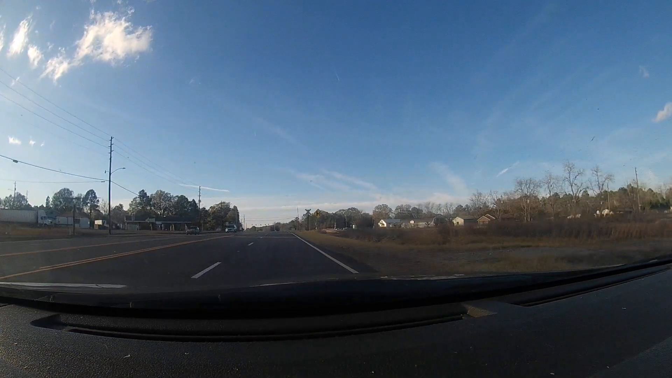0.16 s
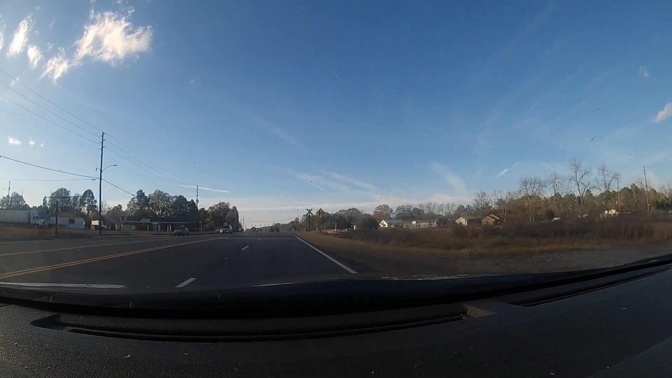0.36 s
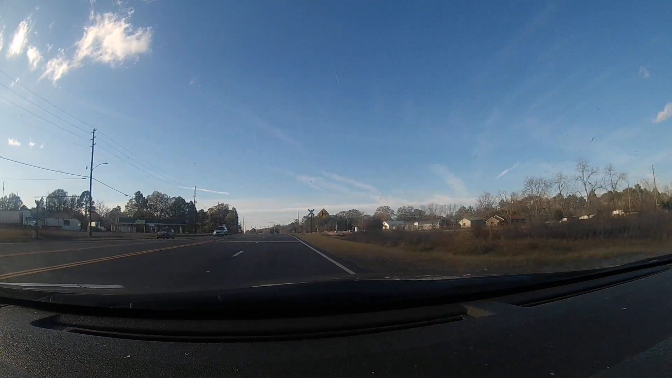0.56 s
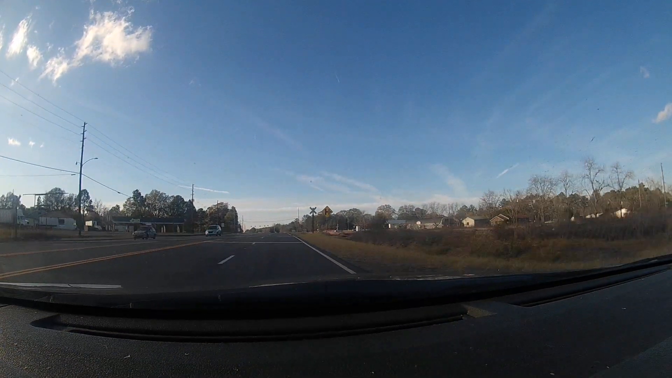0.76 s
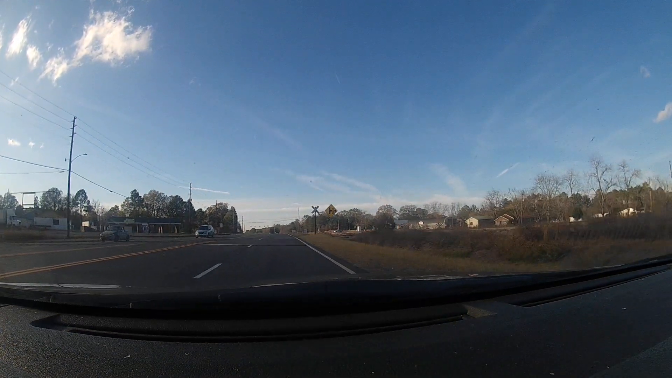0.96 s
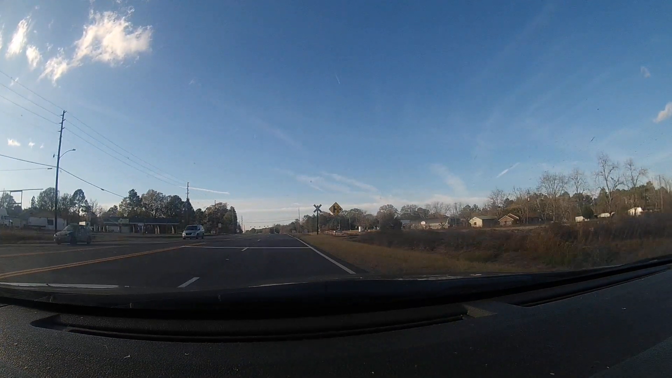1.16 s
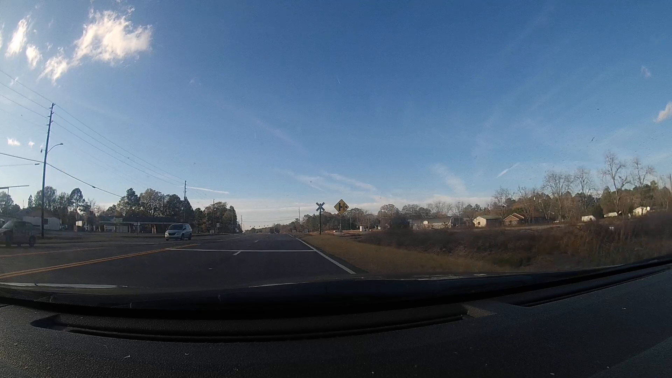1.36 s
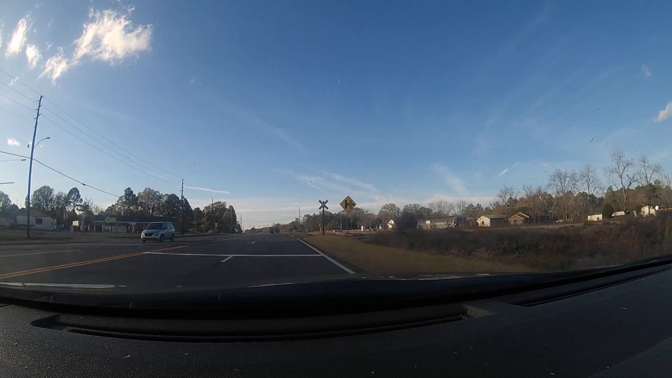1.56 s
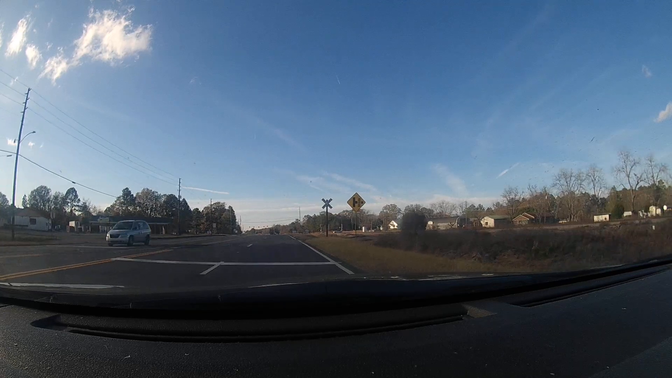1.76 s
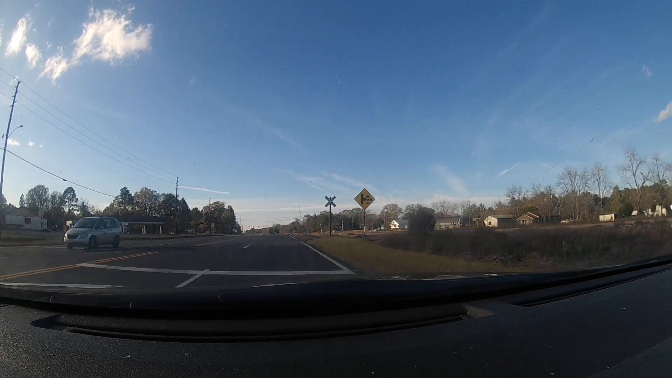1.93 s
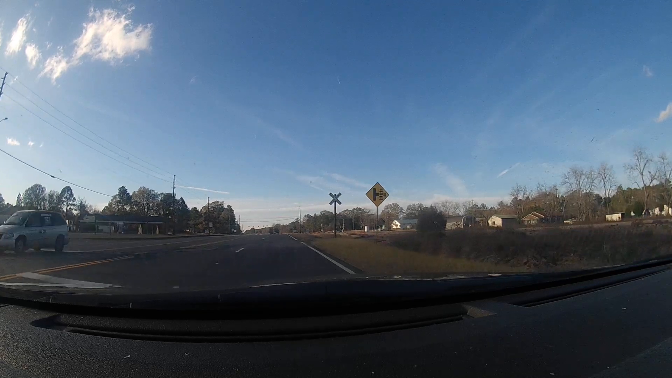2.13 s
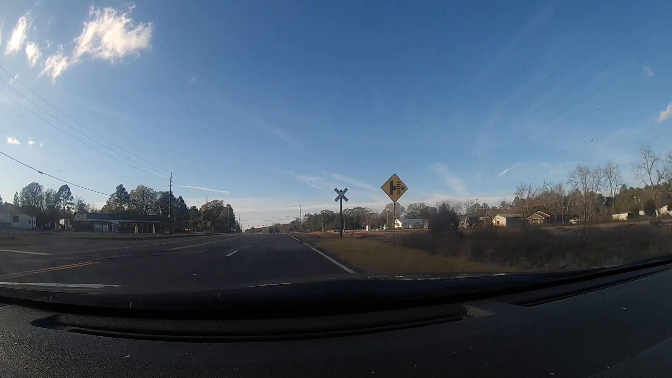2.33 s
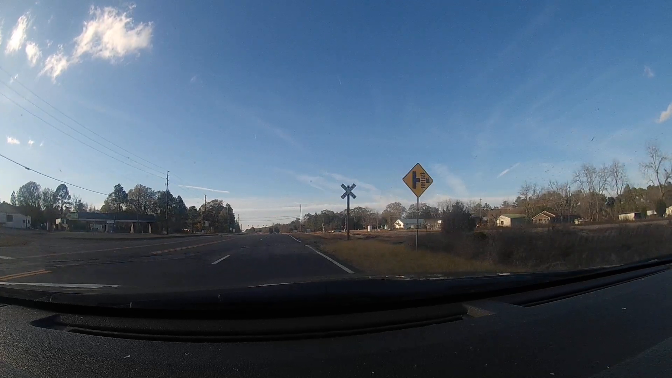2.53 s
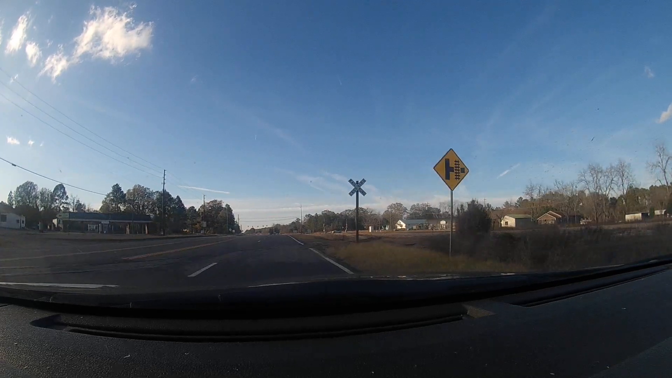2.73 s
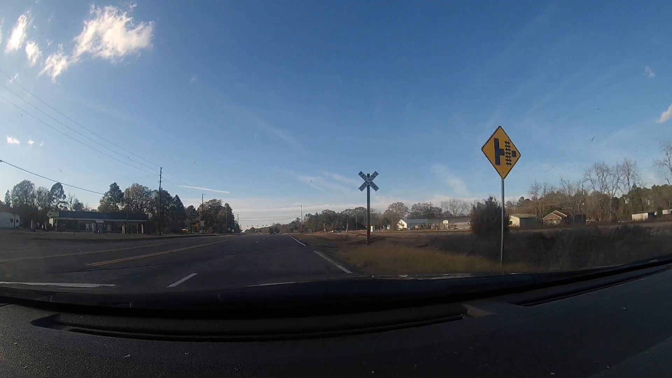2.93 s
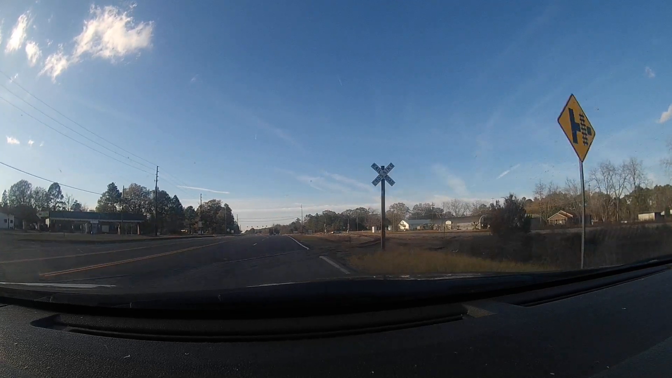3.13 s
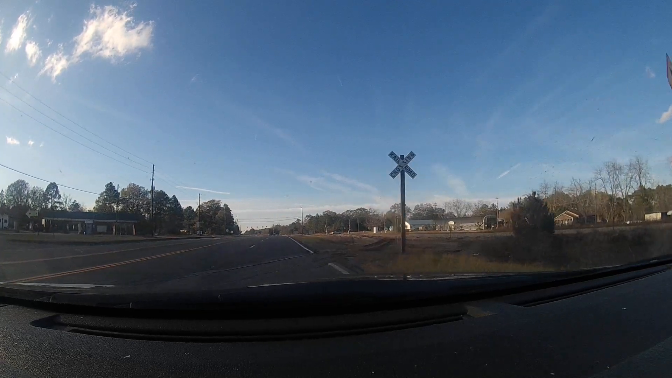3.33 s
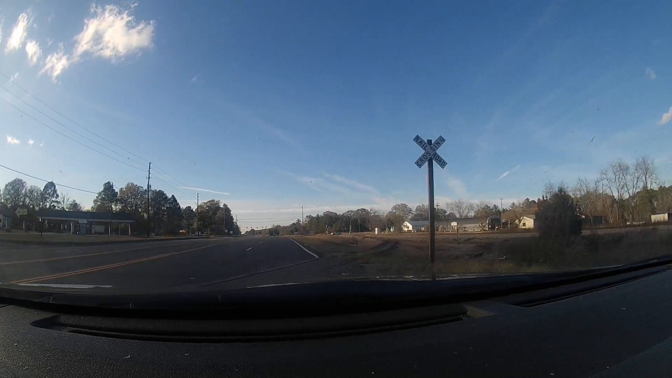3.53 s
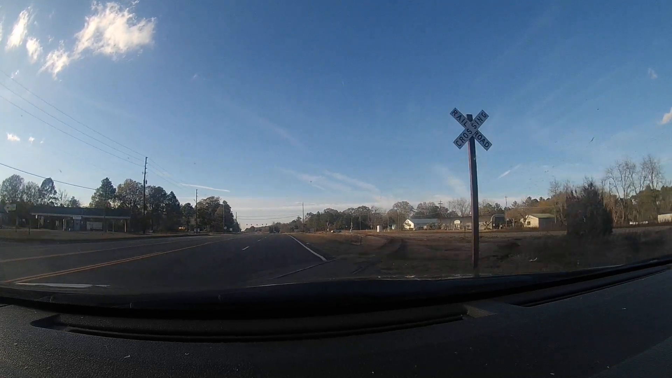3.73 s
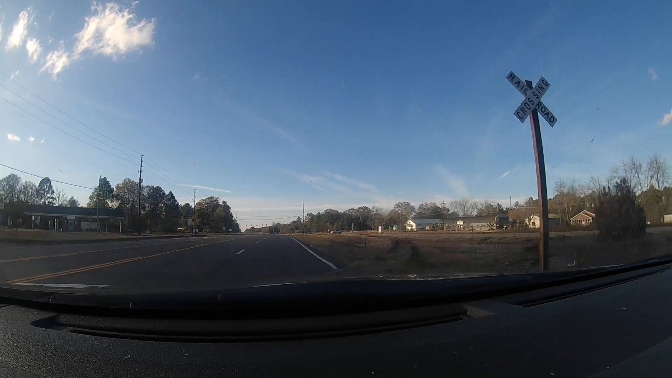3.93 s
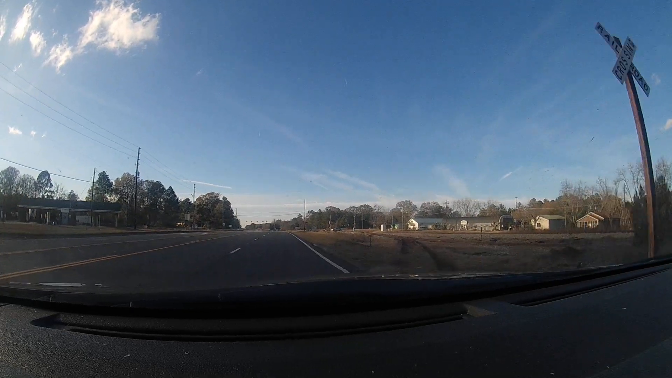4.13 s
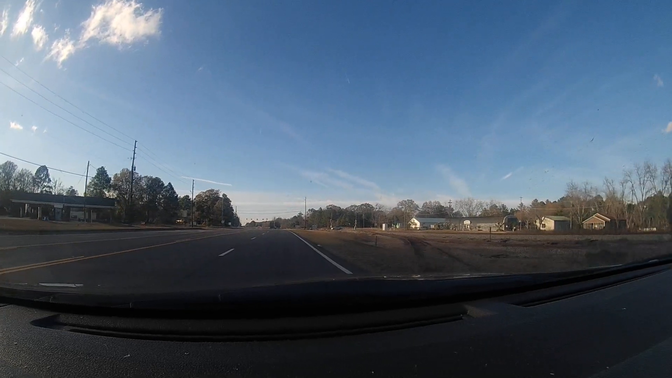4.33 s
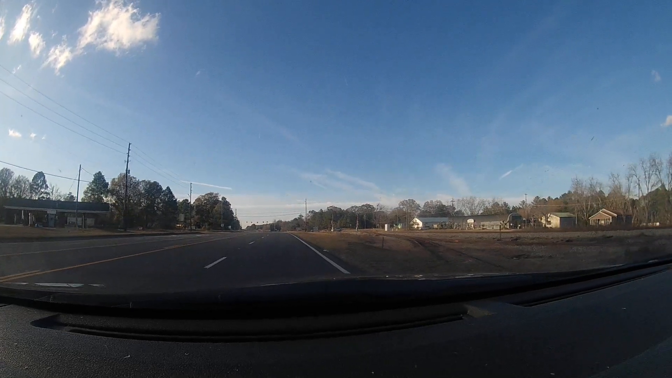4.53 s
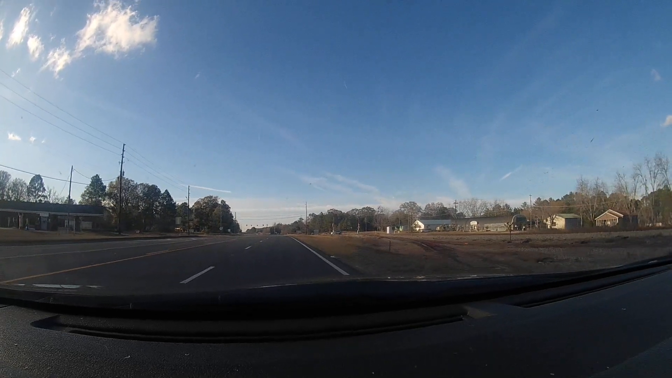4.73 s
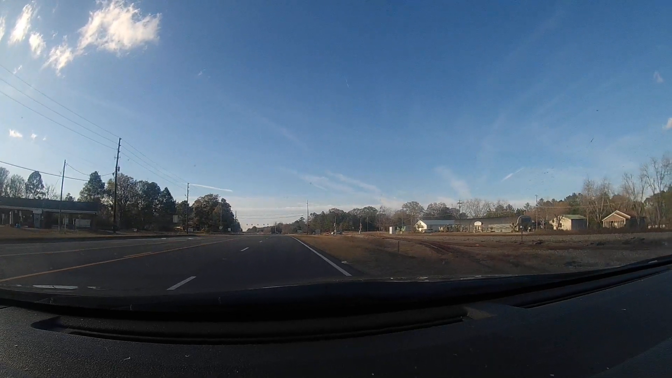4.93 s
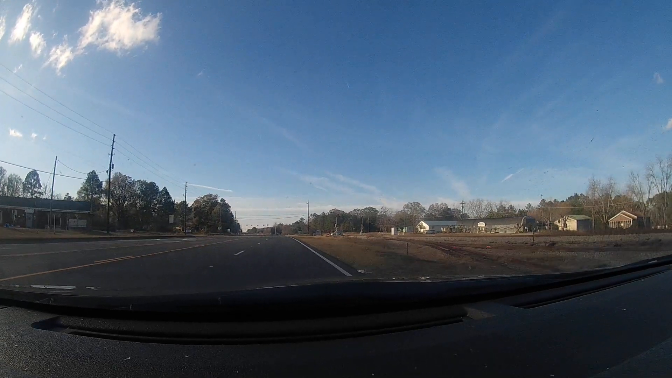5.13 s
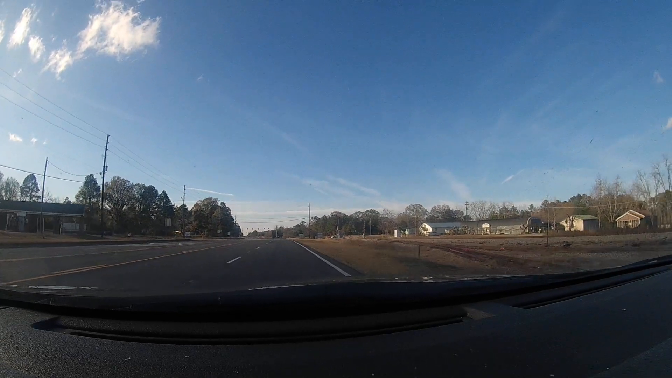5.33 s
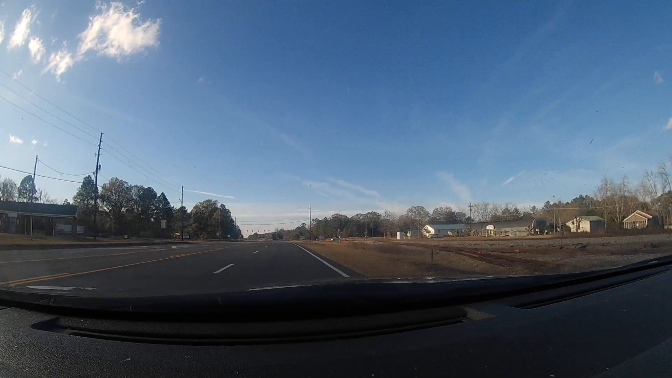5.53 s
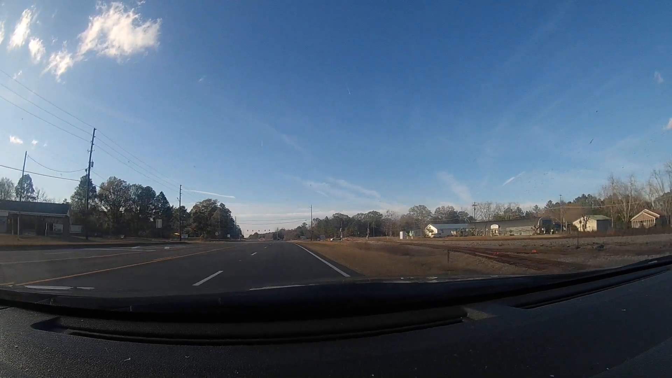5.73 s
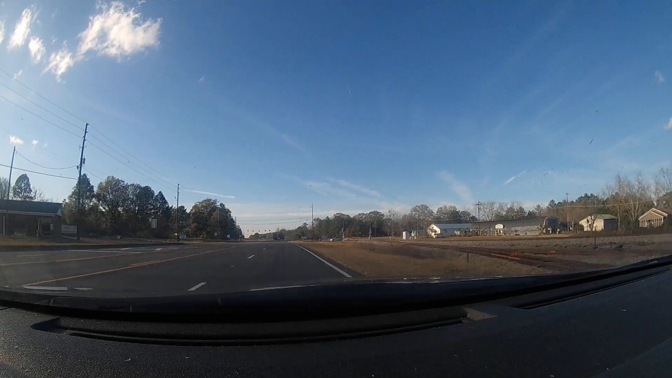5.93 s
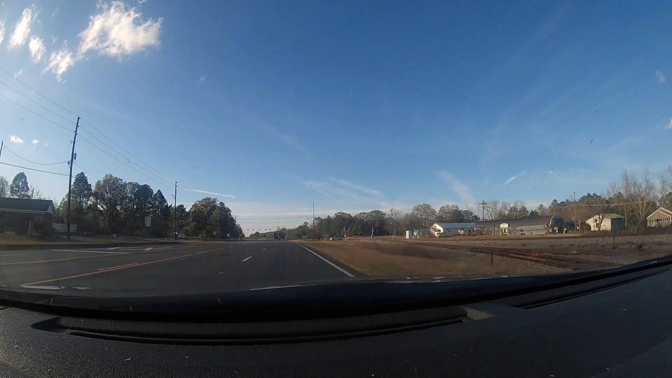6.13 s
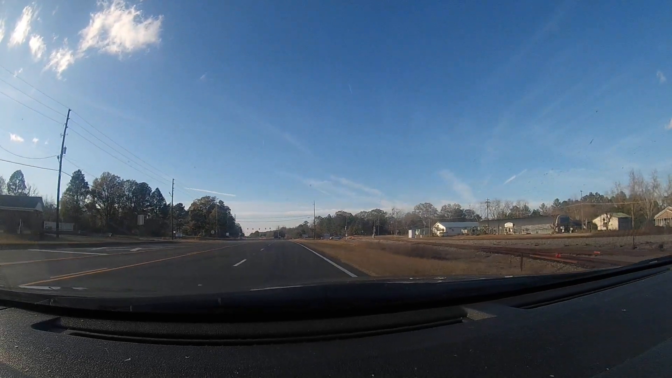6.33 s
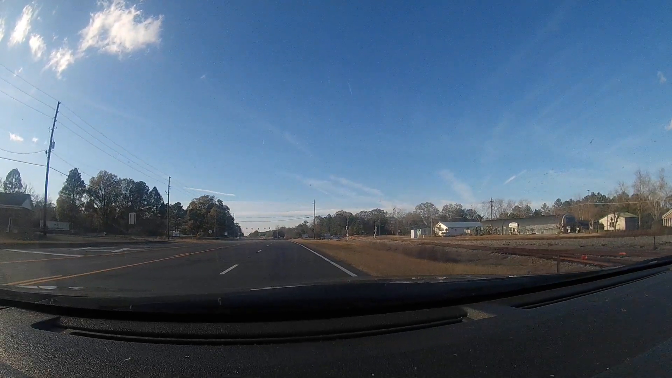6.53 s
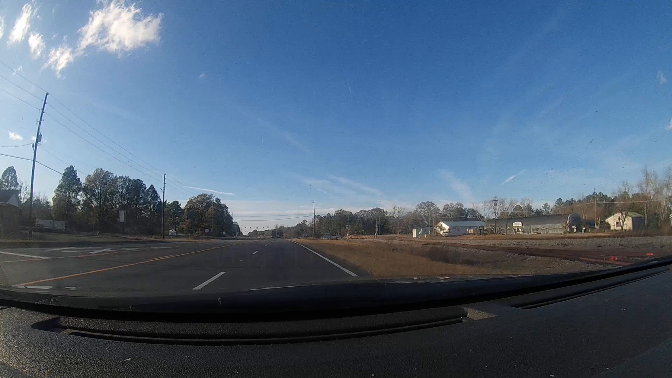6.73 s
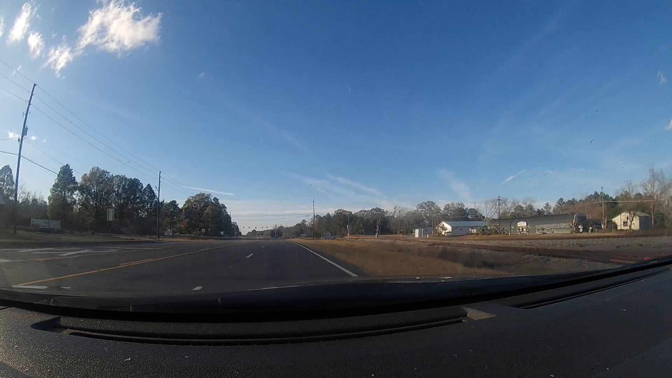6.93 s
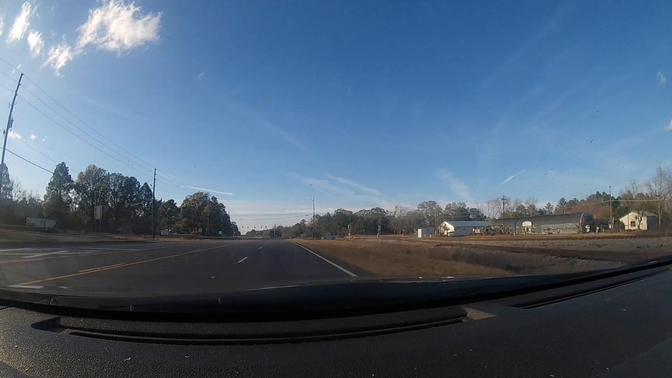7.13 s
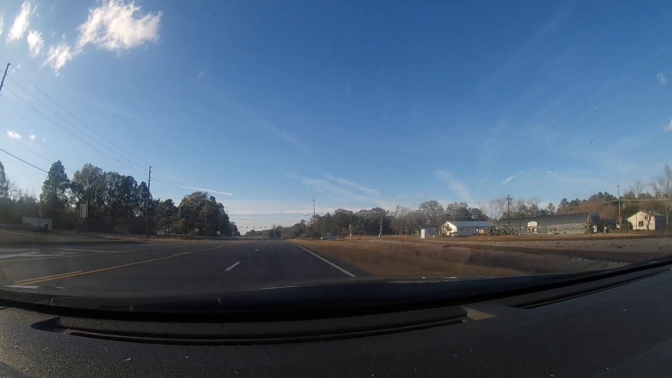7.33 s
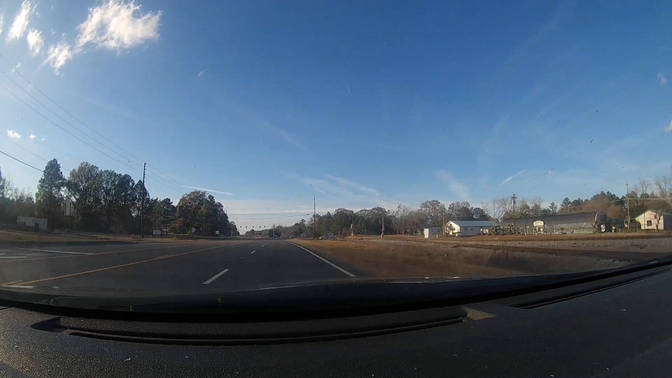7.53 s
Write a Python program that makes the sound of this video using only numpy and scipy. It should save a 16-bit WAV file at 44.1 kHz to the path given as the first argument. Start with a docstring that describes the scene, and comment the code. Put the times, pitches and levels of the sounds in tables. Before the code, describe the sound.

A camera at the windscreen hears the cabin of a car on a highway: heavy, wavering low boom, body rumble, muffled tyre roar and drone, thin air hiss and a low engine hum. Light plastic ticks scatter over the first 1.5 s. Around 2 s an oncoming car gives a soft swell of tyre noise and fades as this car slows. A bump thumps at 2.7 s with more ticks; from about 3 s the road is smoother and slightly quieter. At 3.5-3.9 s tyres growl and quick clicks cluster. From 4 to 4.8 s the rails bring deep, overloaded booms, thumps near 4.3 and 4.55 s, creaking, sizzling trim and hard chattering plastic knocks from 4.5 s. After 5 s the knocks stop; engine hum rises, strongest near 6.3 s, and fuller tyre roar returns until 7.6 s. Very faint electronic hiss, high whine and chirps lie underneath.

```python
"""A deep boom, a tyre roar and an engine hum fill a car on a highway, heard from a camera at the windscreen.
The car slows, rolls over a level crossing and picks up speed. Shaped noise makes the boom, roar and air hiss;
sine waves on multiples of the wheel and firing rates make the tyre drone and the engine.
Loose plastic rings in light ticks and, on the rails, in hard knocks; an oncoming car swells and fades.
The camera adds hiss, whine and chirps, overloads on the deepest booms and limits the peaks."""
import sys
import numpy as np
from scipy import signal
from scipy.fft import rfft, irfft
from scipy.io import wavfile
from scipy.ndimage import uniform_filter1d, minimum_filter1d

SR = 44100
rng = np.random.default_rng(int(sys.argv[2]) if len(sys.argv) > 2 else 0)


def to_wav(s):
    """Save 16-bit WAV."""
    ch = np.atleast_2d(s).T  # columns
    pcm = np.round(np.clip(ch, -1, 1) * 32767)  # PCM
    wavfile.write(sys.argv[1], SR, pcm.astype(np.int16))


N = 334719
T = np.arange(N) / SR
HIT_T = T[:3000]  # the time within one short contact


def undb(db):
    """Turn decibels into a gain."""
    return 10 ** (np.asarray(db) / 20)


def unit(x):
    """Scale a sound to an average (rms) level of 1."""
    return x / np.sqrt(np.mean(x ** 2))


def curves(table):
    """Draw each column of a time table as a smooth run of samples."""
    s, *columns = np.transpose(table)
    return [np.interp(T, s, column) for column in columns]


def walk(rate_hz):
    """Wander at random: levels held for 1 / rate seconds, smoothed twice, rms 1."""
    hold = int(SR / rate_hz)
    held = rng.standard_normal(1024)[np.arange(N) // hold]
    return unit(uniform_filter1d(uniform_filter1d(held, hold), hold))


def noise(colour, resonances=()):
    """Make noise of rms 1 with a broad colour, lifted around each resonance."""
    f = np.arange(N // 2 + 1) * SR / N
    hz, db = np.transpose(colour)
    gain = undb(np.interp(np.log(f + 1), np.log(hz), db))
    # beyond its ends the colour falls away steeply
    gain = gain * np.minimum(f / hz[0], 1) ** 2 * np.minimum(hz[-1] / (f + 1), 1) ** 2
    for centre, width, lift_db in resonances:
        gain = gain * undb(lift_db / (1 + (2 * (f - centre) / width) ** 2))
    return unit(irfft(rfft(rng.standard_normal(N)) * gain, N))


def even(x, span_s):
    """Hold a noise's slow level steady, keeping its quick beating."""
    span = int(span_s * SR)
    power = uniform_filter1d(uniform_filter1d(x ** 2, span), span)
    return x / np.sqrt(power)


def stretch(start_s, end_s, edge_s):
    """Give 1 while the car is on a stretch of road and 0 elsewhere, with soft edges."""
    return (np.tanh((T - start_s) / edge_s) - np.tanh((T - end_s) / edge_s)) / 2


def rotor(turn_hz, orders, waver_db, slip_rad):
    """Add up sines at multiples of a turning rate, each wavering in level and phase."""
    turn = 2 * np.pi * np.cumsum(turn_hz) / SR
    total = np.zeros(N)
    for multiple, db in orders:
        level = undb(db + waver_db * walk(5.5))
        start = 2 * np.pi * rng.random()
        total += level * np.sin(multiple * turn + slip_rad * walk(4) + start)
    return unit(total)


def ring(modes, scatter_db, detune, contact_hz):
    """Strike a set of fading tones, peak 1; neighbouring tones swing in opposite directions."""
    hz, db, t60 = np.transpose(modes)[:, :, None]
    weight, shift = rng.standard_normal((2, len(modes), 1))
    direction = (-1) ** np.arange(len(modes))[:, None]
    swing = direction * np.sin(2 * np.pi * hz * (1 + detune * shift) * HIT_T)
    fade = np.exp(-np.log(1000) * HIT_T / t60)
    y = np.sum(undb(db + scatter_db * weight) * fade * swing, axis=0)
    # a softer contact pushes for longer and wakes less treble
    softness = signal.butter(2, min(contact_hz, SR / 3), fs=SR, output="sos")
    y = signal.sosfilt(softness, y)
    return y / np.abs(y).max()


def add(out, s, sound):
    """Mix a short sound in at time s."""
    i = int(s * SR)
    out[i:i + len(sound)] += sound[:N - i]


# bumps in the road, the biggest at the rails: (time [s], cabin boom level [dB])
BUMPS = [(0.2, -17), (0.45, -17), (0.94, -16.5), (1.22, -15.5), (2.32, -14), (2.711, -11.5), (3.08, -14),
         (3.45, -18.5), (3.8, -13), (4.07, -8.5), (4.3, -5.5), (4.441, -8), (4.74, -9.5), (5.47, -16.5),
         (5.93, -23), (6.35, -13.5), (6.78, -14.5), (7.07, -13), (7.4, -14.5)]
BUMP_RISE_S, BUMP_DECAY_S, STEADY_BOOM_DB = 0.083, 0.33, -19.5


def heave():
    """Find the cabin boom's level in dB: each bump's energy adds to that of the steady road."""
    power = undb(STEADY_BOOM_DB) ** 2
    for s, db in BUMPS:
        before, after = np.minimum(T - s, 0), np.maximum(T - s, 0)
        swell = np.exp(-(before / BUMP_RISE_S) ** 2 - after / BUMP_DECAY_S)
        power = power + (undb(db) * swell) ** 2
    return 10 * np.log10(power)


# colour of the cabin's boom: (frequency [Hz], relative level [dB per Hz])
BOOM_COLOUR = [(8, -22), (17, 8), (31, 2), (45, 3), (56, -13.5), (80, -7.5), (100, -10), (150, -32.5)]
# the cabin's lowest air resonance: (frequency [Hz], width [Hz], lift [dB])
BOOM_RESONANCE = [(42.1, 31, 5.5)]
# colour of the axles' thump: (frequency [Hz], relative level [dB per Hz])
AXLE_COLOUR = [(52, -5), (66, 0), (74, -3.5), (82, -2.5), (95, -8), (130, -11), (155, -13.5), (190, -17.5)]
# colour of the body's rumble: (frequency [Hz], relative level [dB per Hz])
BODY_COLOUR = [(70, -24.5), (105, 3), (130, 3), (160, -0.5), (210, -7), (243, 1), (280, -4.5), (325, -4.5),
               (370, -10.5), (430, -11.5), (490, -22), (700, -32), (1500, -54)]
# course of the body's rumble, before its gain: (time [s], level [dB])
RUMBLE_LEVEL = [(0.15, -24.5), (0.21, -24), (1.55, -24), (1.59, -26), (2.35, -23), (3.28, -27),
                (3.6, -24.5), (4.66, -23.5), (5.01, -25), (7.41, -23.5), (7.45, -25)]
RUMBLE_GAIN_DB = 3
# the axles swell more steeply than the cabin: level at a 0 dB boom [dB], slope [dB per dB]
AXLE_DB, AXLE_SLOPE = 0, 1.77


def shaking(boom_db):
    """Road texture shakes the cabin air, the axles and the body: three bands of low noise."""
    rumble_db, = curves(RUMBLE_LEVEL)
    boom = even(noise(BOOM_COLOUR, BOOM_RESONANCE), span_s=0.096) * undb(boom_db)
    axle = even(noise(AXLE_COLOUR), span_s=0.14) * undb(AXLE_DB + AXLE_SLOPE * boom_db)
    body = even(noise(BODY_COLOUR), span_s=0.16) * undb(rumble_db + RUMBLE_GAIN_DB)
    return boom + axle + body


# road speed, also played by tyres(): (time [s], wheel turns [Hz], tyre drone level [dB])
WHEEL_SPEED = [(0, 7.12, -16), (1, 7.08, -20.5), (1.8, 6.03, -28.5), (2.6, 7.36, -23.5), (3.3, 5.82, -23),
               (4.3, 5.5, -17), (5.5, 5.83, -27), (7.59, 7.14, -21)]
# colour of the tread's roar: (frequency [Hz], relative level [dB per Hz])
ROAR_COLOUR = [(300, -4), (550, 1), (800, -3), (1000, 0.5), (1130, -3.5), (1300, -3.5), (1600, -6.5),
               (1760, -17), (2200, -33), (4000, -41.5)]
# air resonances of the cabin that colour the roar: (frequency [Hz], width [Hz], lift [dB])
CABIN_RESONANCES = [(559.5, 28, 5), (742.4, 79, 9.5), (885, 53, 8.5), (1033, 153, 7), (1233, 44, 8.5)]
# colour of the air's hiss: (frequency [Hz], relative level [dB per Hz])
HISS_COLOUR = [(900, 4.5), (1950, 9.5), (2200, 5), (2450, 7), (2950, 2.5), (3250, -2), (3620, -1),
               (3950, -10), (4500, -15), (7000, -50)]
# levels at the cruising wheel rate, on ordinary asphalt
CRUISE_HZ, ROAR_DB, HISS_DB, SPEED_DB_PER_DOUBLING = 6.5, -27.5, -43.5, 3
# smoother asphalt lies either side of the crossing
SMOOTH_FROM_S, SMOOTH_TO_S, SEAM_S = 3.05, 6.3, 0.23
SMOOTH_ROAR_DB, SMOOTH_HISS_DB = -2.5, -4
# both flutter quickly; the hiss also gusts more slowly
ROAR_FLUTTER_DB, HISS_FLUTTER_DB, HISS_GUST_DB = 0.9, 0.8, 0.5


def roar_and_hiss():
    """Tread roar and air hiss leak in through the glass, louder with speed."""
    wheel_hz, _ = curves(WHEEL_SPEED)
    speed_db = SPEED_DB_PER_DOUBLING * np.log2(wheel_hz / CRUISE_HZ)
    smooth = stretch(SMOOTH_FROM_S, SMOOTH_TO_S, SEAM_S)
    roar_db = ROAR_DB + speed_db + SMOOTH_ROAR_DB * smooth + ROAR_FLUTTER_DB * walk(14)
    hiss_db = HISS_DB + speed_db + SMOOTH_HISS_DB * smooth
    hiss_db = hiss_db + HISS_FLUTTER_DB * walk(30) + HISS_GUST_DB * walk(3.86)
    return noise(ROAR_COLOUR, CABIN_RESONANCES) * undb(roar_db) + noise(HISS_COLOUR) * undb(hiss_db)


# tyre unevenness: (multiple of the wheel rate, relative level [dB])
TYRE_ORDERS = [(6, -1), (14, -14), (15, 1), (16, -5.5), (17, -21.5), (18, -1), (19, -14), (29, -14.5),
               (33, -5.5), (34, -15)]


def tyres():
    """Uneven tyres repeat their pattern every turn: a drone that follows the speed."""
    turn_hz, db = curves(WHEEL_SPEED)
    return rotor(turn_hz, TYRE_ORDERS, waver_db=2.0, slip_rad=0.35) * undb(db)


# course of the engine: (time [s], firing rate [Hz], level [dB])
ENGINE_SPEED = [(0, 67.6, -29), (2, 64.73, -32.5), (4.4, 58.9, -46), (5.2, 61.15, -24.5), (6.3, 61.54, -21),
                (7.59, 65.25, -31.5)]
# tones of the engine: (multiple of the firing rate, relative level [dB])
ENGINE_ORDERS = [(1, 3), (2, 3.5), (3, 0.5), (4, -11), (7, -9)]


def engine():
    """Regular firing makes a muffled hum, which grows as the car pulls away."""
    firing_hz, db = curves(ENGINE_SPEED)
    return rotor(firing_hz, ENGINE_ORDERS, waver_db=5.0, slip_rad=0.1) * undb(db)


# colour of the camera's own hiss: (frequency [Hz], relative level [dB per Hz])
SELF_NOISE_COLOUR = [(100, -2), (5000, -2.5), (8000, -3), (15500, -5)]
# the camera's electrical whine: (frequency [Hz], rms level [dB])
WHINE_TONES = [(15215, -81), (15309, -72), (15404, -74), (15499, -82)]
SELF_NOISE_DB = -62


def electronics():
    """The camera's circuits hiss, and whine on a few steady, very high tones."""
    out = noise(SELF_NOISE_COLOUR) * undb(SELF_NOISE_DB)
    for hz, db in WHINE_TONES:
        out += np.sqrt(2) * undb(db) * np.sin(2 * np.pi * hz * T)
    return out


# the crack of a hard contact: (frequency [Hz], relative level [dB per Hz])
CRACK_COLOUR = [(450, -8), (800, -3), (1300, 8), (2000, 2), (2700, 4), (3600, 2), (4100, -1), (5300, -4),
                (7000, -16), (11000, -24), (15500, -33)]


def burst(length_s):
    """Grind for a few milliseconds: coloured noise, cut off quickly."""
    hz, db = np.transpose(CRACK_COLOUR)
    f = np.arange(len(HIT_T) // 2 + 1) * SR / len(HIT_T)
    gain = undb(np.interp(f, hz, db)) * np.minimum(f / hz[0], 1) ** 2
    grit = irfft(gain * np.exp(2j * np.pi * rng.random(len(f))))
    return unit(grit) * np.exp(-(HIT_T / length_s) ** 2)


# light ticks of loose plastic, before their gain: (time [s], level [dB])
TICK_TIMES = [(0.0317, -27.5), (0.098, -23.5), (0.155, -28), (0.231, -21.5), (0.3645, -23.5), (0.783, -28),
              (0.918, -32), (1.191, -39), (1.3256, -29.5), (1.467, -39), (1.5243, -23.5), (2.354, -26.5),
              (2.611, -26), (2.682, -20.5), (2.8374, -27.5), (2.9766, -24), (3.3204, -23), (3.6479, -15.5),
              (3.6867, -29), (3.6998, -13.5), (3.7227, -19.5), (3.748, -20), (3.786, -17.5), (3.8518, -38),
              (3.9845, -36), (4.0237, -28), (4.0997, -28), (4.16, -27), (4.2437, -28), (4.271, -26),
              (4.2857, -22), (4.3696, -36), (4.3986, -41), (4.442, -29), (4.4784, -29), (4.504, -29),
              (4.517, -27), (4.8844, -35.5), (4.9059, -40)]
# what the plastic rings with, also in knocks(): (frequency [Hz], relative level [dB], 60 dB fade [s])
PLASTIC_MODES = [(1340, 4, .007), (1670, -9, .037), (1920, -2, .018), (2309, 4.5, .008), (2618, 0, .042),
                 (2802, 2, .01), (3310, -.5, .008), (3581, -1.5, .013), (4370, -2.5, .007),
                 (5253, -19, .022), (5955, -9, .021), (8160, -11, .004), (10697, -6, .005),
                 (14000, -4, .002)]
# each tick also scrapes briefly: level relative to the ring [dB], length [s]
TICK_GAIN_DB, TICK_GRIT_DB, TICK_GRIT_S = 3.5, -17, .0065


def ticks():
    """One loose piece taps the same spot again and again: nearly the same click every time."""
    out = np.zeros(N)
    for s, db in TICK_TIMES:
        # harder ticks are brighter
        contact_hz = 8500 * undb(0.28 * db)
        click = ring(PLASTIC_MODES, scatter_db=1.0, detune=.004, contact_hz=contact_hz)
        grit = undb(TICK_GRIT_DB) * burst(TICK_GRIT_S)
        add(out, s, undb(db + TICK_GAIN_DB) * (click + grit))
    return out


GLASS_LAG_S, GLASS_DB = .0006, -3


def glass(x):
    """The windscreen throws each contact straight back, as one short echo."""
    lag = int(GLASS_LAG_S * SR)
    return x + undb(GLASS_DB) * np.pad(x, (lag, 0))[:len(x)]


# colour of the camera's chirp: (frequency [Hz], relative level [dB per Hz])
CHIRP_COLOUR = [(11900, -33), (12600, 0), (13200, -33)]
CHIRP_FIRST_S, CHIRP_EVERY_S, CHIRP_LENGTH_S, CHIRP_DB = .29, .555, .025, -71


def chirps():
    """The camera's electronics chirp faintly and very high, about twice a second."""
    # time to the nearest chirp
    offset = (T - CHIRP_FIRST_S + CHIRP_EVERY_S / 2) % CHIRP_EVERY_S - CHIRP_EVERY_S / 2
    return noise(CHIRP_COLOUR) * undb(CHIRP_DB) * np.exp(-(offset / CHIRP_LENGTH_S) ** 2)


# colour of the oncoming tyres through the glass: (frequency [Hz], relative level [dB per Hz])
ONCOMING_COLOUR = [(900, -13.5), (1250, 5), (1560, -4.5), (1800, -14.5), (2300, -24.5), (2900, -14.5),
                   (3600, -35)]
ONCOMING_DB, PASSING_S, PASSING_WIDTH_S = -36.5, 1.95, 0.68


def oncoming():
    """A car in the opposite lane swells as it nears and fades with distance."""
    distance = np.hypot(1, (T - PASSING_S) / PASSING_WIDTH_S)
    return noise(ONCOMING_COLOUR) * undb(ONCOMING_DB) / distance


# trim rubbing and creaking, and at 4.519 s the low crunch of the first knock, level before the swell: # (time
# [s], length [s], centre frequency [Hz], width [Hz], level [dB])
RUB_TIMES = [(1.52, 0.33, 2730, 1190, -47), (1.637, 0.02, 1200, 1890, -36), (3.525, 0.067, 1540, 140, -37),
             (4.235, 0.096, 1890, 900, -33.5), (4.252, 0.071, 2980, 2590, -44.5),
             (4.487, 0.086, 1390, 1110, -31.5), (4.519, .022, 857, 380, -15), (6.43, .095, 3250, 250, -53)]
CATCHES_PER_S = 2500


def rubs():
    """Trim panels slip over each other in dense tiny catches, swelling and fading; the first knock crunches in
    the same way."""
    out = np.zeros(N)
    for s, length, hz, width, db in RUB_TIMES:
        n = int(length * SR)
        catches = (rng.random(n) < CATCHES_PER_S / SR) * rng.uniform(-1.2, 1, n)
        low = np.hypot(hz, width / 2) - width / 2
        band = signal.butter(3, [low, low + width], "band", fs=SR, output="sos")
        creak = unit(signal.sosfilt(band, catches))
        swell = np.sqrt(np.sin(np.pi * np.arange(n) / n))
        add(out, s, undb(db) * creak * swell)
    return out


# sharp edges under the wheels: (time [s], level at the top of the swing [dB])
THUMP_TIMES = [(2.708, -9), (4.29, -7), (4.556, -8)]
# the suspension's swing, and the time its strength takes to peak
THUMP_HZ, THUMP_RISE_S = 75.4, 0.0091


def thumps():
    """A wheel drops over a sharp edge: the suspension gives a few quick, deep swings."""
    out = np.zeros(N)
    for s, db in THUMP_TIMES:
        age = np.maximum(T - s, 0)
        strength = age / THUMP_RISE_S * np.exp(1 - age / THUMP_RISE_S)
        out += undb(db) * strength * np.sin(2 * np.pi * THUMP_HZ * age)
    return out


# colour of the growl: (frequency [Hz], relative level [dB per Hz])
GROWL_COLOUR = [(120, -7), (158, 4), (195, -15)]
WORN_FROM_S, WORN_TO_S, WORN_EDGE_S, GROWL_DB = 3.52, 3.9, 0.028, -21


def worn_patch():
    """A worn patch of road just before the rails makes the tyres growl."""
    growl = even(noise(GROWL_COLOUR), span_s=0.087) * undb(GROWL_DB)
    return growl * stretch(WORN_FROM_S, WORN_TO_S, WORN_EDGE_S)


# contacts at the strongest boom; their rate falls by so many dB per dB of weaker boom
BUZZ_PER_S, BUZZ_DB, BUZZ_SLOPE = 79, -45, 5.9


def buzz(boom_db):
    """The harder the cabin heaves, the more tiny contacts sizzle in the trim."""
    chance, size = rng.random(N), rng.standard_normal(N)
    rate = BUZZ_PER_S * undb(BUZZ_SLOPE * (boom_db - boom_db.max()))
    contacts = (chance < rate / SR) * undb(BUZZ_DB + 3.0 * size)
    return signal.fftconvolve(contacts, burst(0.0046))[:N]


# hard knocks of the plastic, with the thud's level relative to the clack:
# (time [s], level [dB], chatter length [s], panel thud level [dB])
KNOCK_TIMES = [(4.525, -15, 0.0063, 8), (4.534, -10.5, 0.0051, -6), (4.5535, -29.5, .008, 16),
               (4.585, -22, .0025, 2), (4.6055, -14, 0.0089, 3), (4.6306, -19, 0.00314, 11),
               (4.66, -14, .007, 8.5), (4.8082, -18, 0.0076, 12.5), (4.8317, -19, .004, 9.5)]
# the heavier panel behind it: (frequency [Hz], relative level [dB], 60 dB fade [s])
PANEL_MODES = [(1172, 6.5, 0.019), (1384, 3, 0.014), (1720, -1.5, 0.027), (2410, 6.5, 0.014),
               (2760, 4, 0.012)]
# relative to the knock; the rebounds fall further over the chatter
KNOCK_CRACK_DB, REBOUND_DB, REBOUND_FALL_DB = -8.5, -6.5, -5.5


def knocks(count=5):
    """On the rails the plastic slams, cracks and chatters in fading rebounds; the panel behind answers."""
    out = np.zeros(N)
    for s, db, length, thud_db in KNOCK_TIMES:
        # uneven rebounds, as shares of the chatter length
        shares = (np.arange(1, count) + rng.random(count - 1)) / count
        rebounds = zip(shares, REBOUND_DB + REBOUND_FALL_DB * shares)
        for share, contact_db in [(0, 0), *rebounds]:
            clack = ring(PLASTIC_MODES, scatter_db=1.5, detune=.015, contact_hz=5800)
            thud = ring(PANEL_MODES, scatter_db=1.5, detune=.025, contact_hz=3000)
            contact = clack + undb(thud_db) * thud
            add(out, s + share * length, undb(db + contact_db) * contact)
        add(out, s, undb(db + KNOCK_CRACK_DB) * burst(length))
    return out


def scene():
    """Mix everything at the one microphone."""
    boom_db = heave()
    road = shaking(boom_db) + roar_and_hiss() + worn_patch() + thumps()
    vehicles = tyres() + engine() + oncoming()
    trim = glass(ticks() + knocks()) + rubs() + buzz(boom_db)
    camera = electronics() + chirps()
    return (road + vehicles + trim + camera)[None]


def record(dry):
    """Deep booms overload the input and choke quiet sounds; hard knocks break through; peaks are limited."""
    overload_level, sharpness = 0.6, 16
    overloaded = dry / (1 + (np.abs(dry) / overload_level) ** sharpness) ** (1 / sharpness)
    # where the treble is strong, it gets back what the overload took
    ceiling, knock_level, size = .71, .03, 64  # size in samples
    treble = signal.butter(2, 600, "high", fs=SR, output="sos")
    treble_level = uniform_filter1d(np.abs(signal.sosfiltfilt(treble, dry)), 2 * size)
    through = np.minimum(treble_level / (2 * knock_level), 1) ** 2
    overloaded = overloaded + through * signal.sosfiltfilt(treble, dry - overloaded)
    # a coupling high-pass tilts the flat tops
    coupling = signal.butter(1, 13, "high", fs=SR, output="sos")
    coupled = signal.sosfilt(coupling, overloaded)
    # the limiter turns down smoothly around each peak
    gain = minimum_filter1d(ceiling / np.maximum(np.abs(coupled), ceiling), 2 * size)
    gain = uniform_filter1d(uniform_filter1d(gain, size), size)
    # the very top of the treble is cut
    top_cut = signal.ellip(10, .1, 80, 15900, fs=SR, output="sos")
    return signal.sosfilt(top_cut, coupled * gain)


dry = scene()
out = record(dry)
to_wav(out)
```